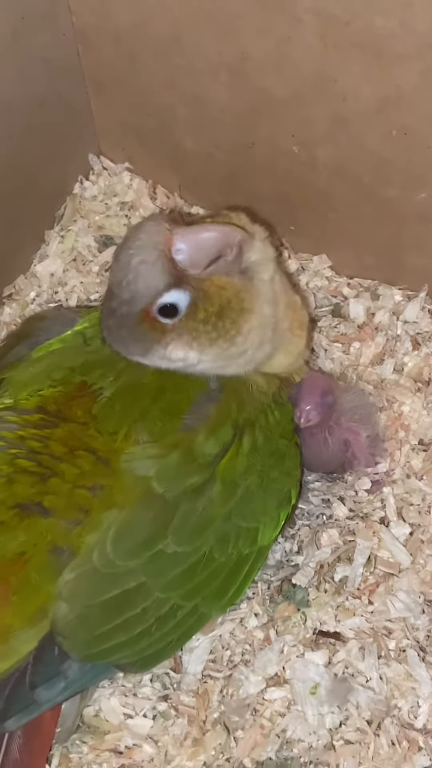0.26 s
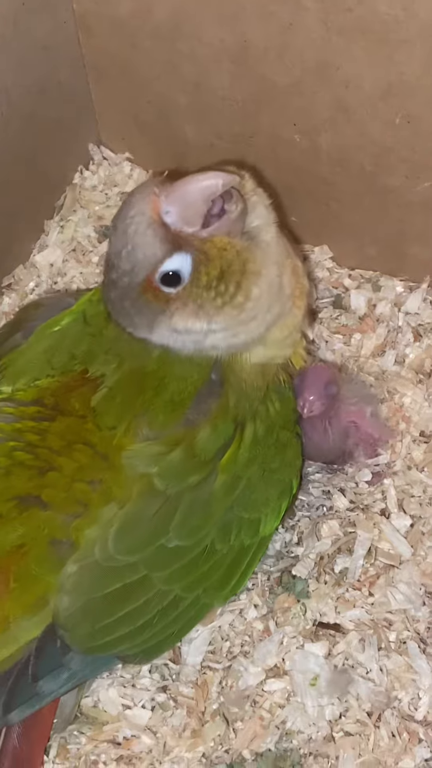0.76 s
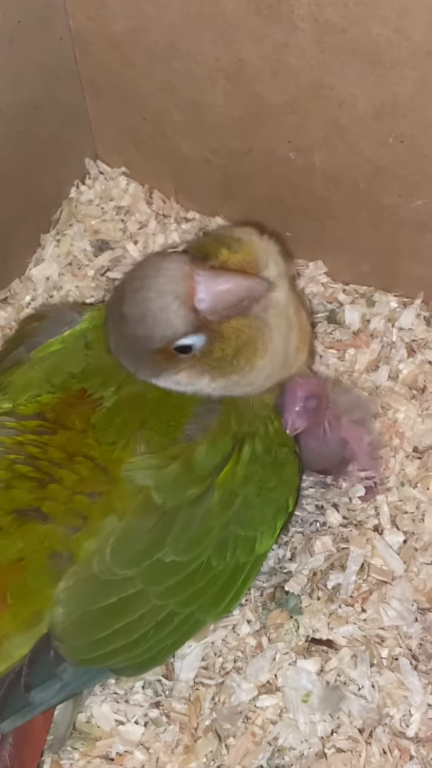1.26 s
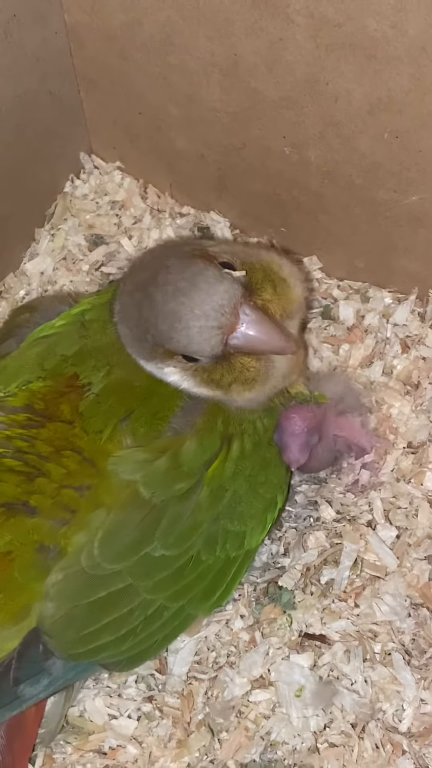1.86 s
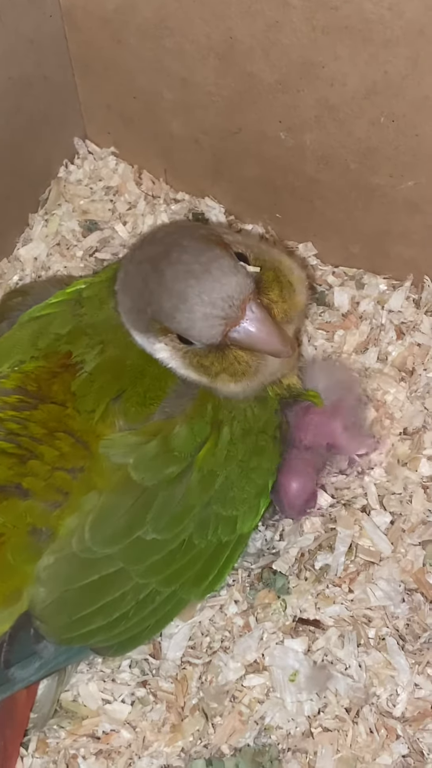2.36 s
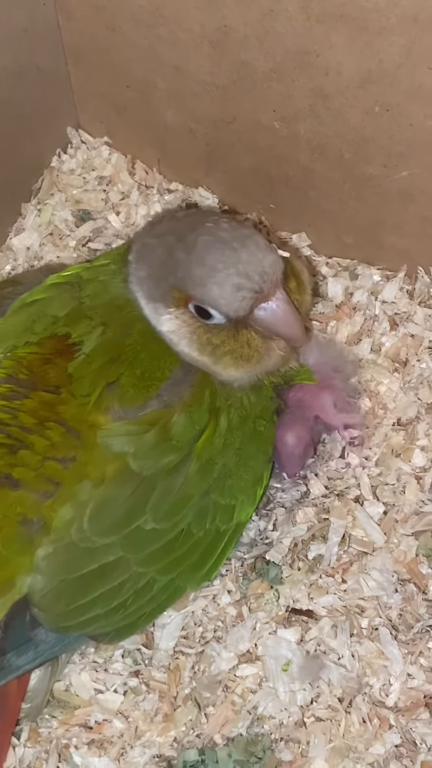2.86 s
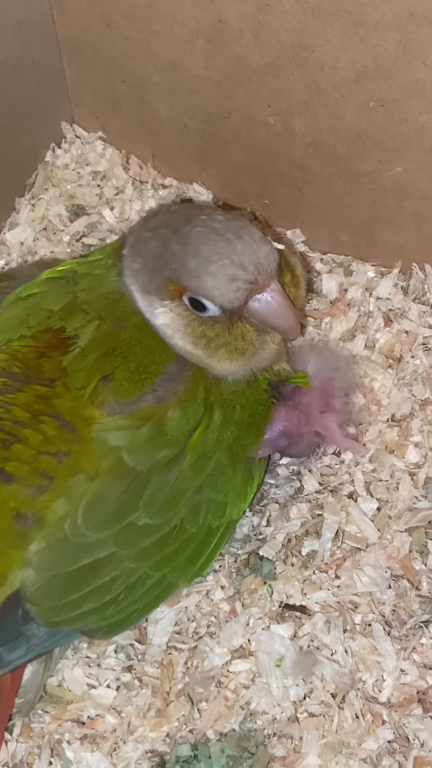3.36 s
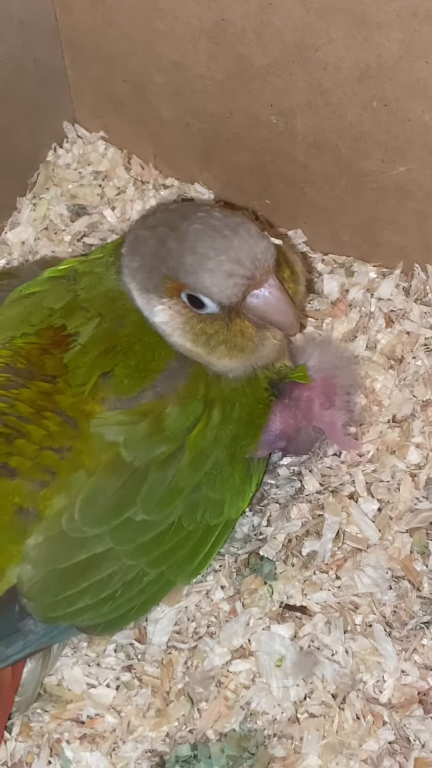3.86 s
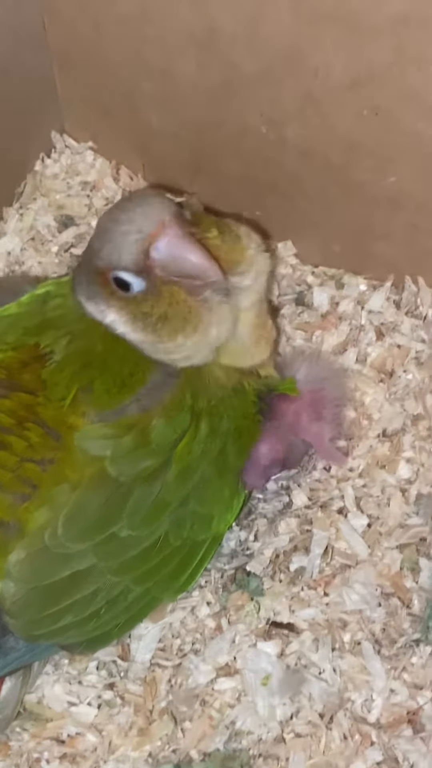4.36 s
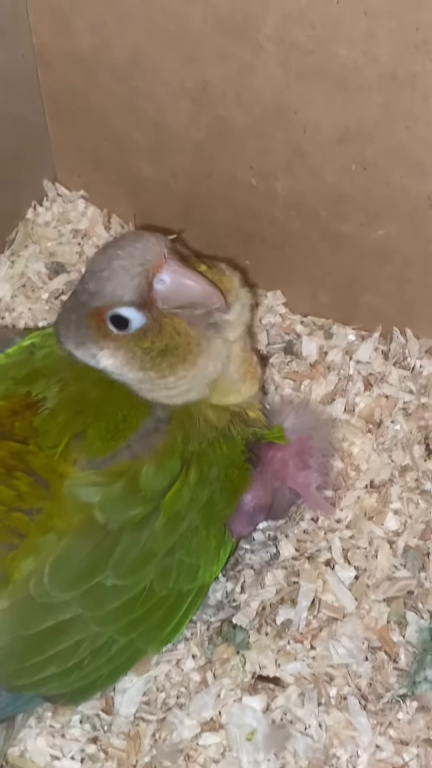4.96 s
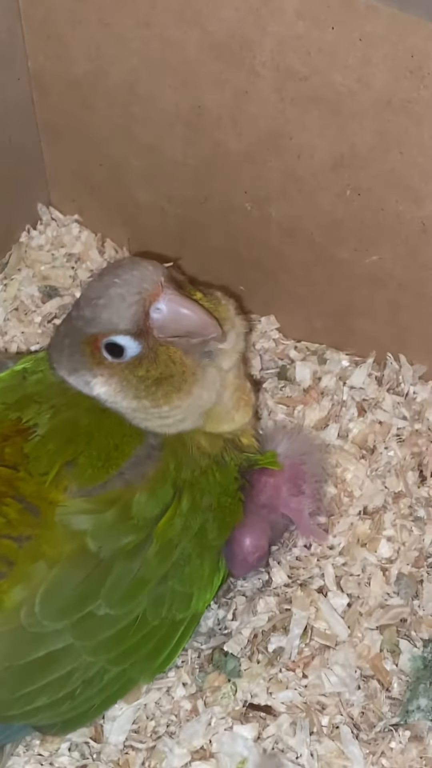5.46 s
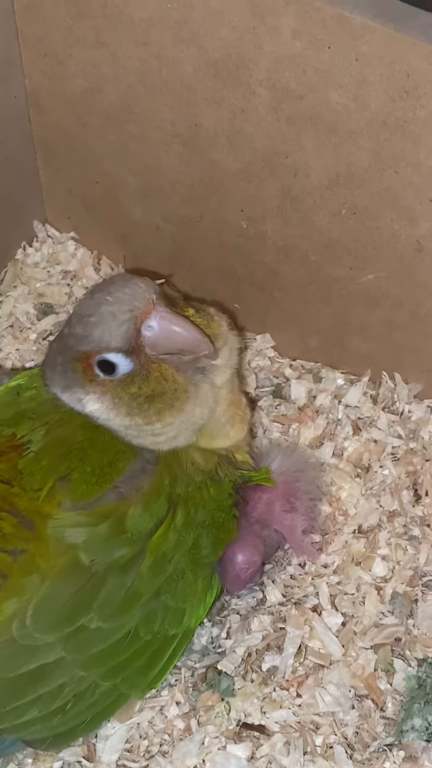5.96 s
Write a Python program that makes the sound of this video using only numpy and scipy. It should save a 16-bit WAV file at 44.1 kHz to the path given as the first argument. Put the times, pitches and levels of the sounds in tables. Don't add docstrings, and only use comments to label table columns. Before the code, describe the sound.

A tiny parrot chick gives hoarse, high peeps about once a second in a nest box, with rustling shavings and a sudden bump near four seconds.

```python
import sys
import numpy as np
from scipy import signal
from scipy.fft import rfft, irfft
from scipy.io import wavfile
from scipy.ndimage import uniform_filter1d, map_coordinates

SR = 44100
rng = np.random.default_rng(int(sys.argv[2]) if len(sys.argv) > 2 else 0)


def linear_from_db(decibels):
    return 10 ** (np.asarray(decibels, float) / 20)


def unload_wav(signal):
    wavfile.write(
        sys.argv[1],
        SR,
        np.round(np.clip(np.atleast_2d(signal).T, -1, 1) * 32767).astype(np.int16),
    )


N = 274302
TIME = np.arange(N) / SR
HZ = np.maximum(np.arange(N // 2 + 1) * SR / N, 1)

# [t/s, level/dB]
HUM = [(0.0, -63), (0.17, -66), (0.33, -51), (0.43, -64), (0.87, -54), (1.0, -65), (2.75, -62.5),
       (3.17, -74), (3.46, -57), (3.93, -58), (3.97, -48), (4.72, -58), (4.8, -46.5), (4.99, -53),
       (5.13, -66.5), (5.68, -59), (5.77, -69), (6.22, -67)]
# [f/Hz, level/dB]
HUM_COLOUR = [(20, -41), (45, -9), (60, -4), (70, 8), (82, -6), (150, -18), (220, -61.5), (500, -100)]
# [f/Hz, level/dB]
BOOM_COLOUR = [(100, -22.5), (160, 4), (300, -6), (430, -4.5), (520, -23), (800, -43)]
# [f/Hz, width/Hz, level/dB]
BOX_AIR = [(320.6, 6.8, 12), (376, 12, 9)]
# [f/Hz, level/dB]
DRAG_COLOUR = [(300, -21.5), (550, 4.5), (900, -2), (1400, -4), (2300, -8), (3500, -14), (7000, -37.5)]
# [f/Hz, level/dB]
SHAVINGS_COLOUR = [(2000, -28.5), (3500, -0.5), (5500, -1.5), (7500, -2), (10000, -5), (13000, -5),
                   (16200, -30)]
# [t/s, time to die by 20 dB/s, walls/dB, dragging/dB, shavings/dB]
MOVES = [(0.0, 0.65, -71, -77, -82), (0.53, .05, -71, -66, -79), (0.49, .1, -76, -75, -90),
         (0.63, .4, -82, -92, -86), (0.845, 0.7, -70, -84, -90), (1.42, 0.45, -73.5, -85.5, -79),
         (1.31, 0.8, -80, -81, -79.5), (1.68, 0.7, -85, -92, -85.5), (1.82, .06, -76, -68, -82),
         (2.0, 0.4, -85, -80, -79.5), (2.185, .08, -74, -80, -72.5), (2.28, .55, -84, -95, -75),
         (2.985, 0.1, -80, -85, -80), (2.8, 0.64, -87, -89.5, -87), (3.279, 0.13, -72, -93, -73.5),
         (3.45, .5, -59.5, -74.5, -84), (3.68, 0.32, -74.5, -84, -71), (3.77, 0.22, -83, -74, -68),
         (3.97, .09, -57, -59, -66), (4.037, .08, -45, -57, -66), (4.23, 0.9, -60.5, -75.5, -86.5),
         (4.85, 1.23, -72, -83.5, -99), (5.3, 1.1, -79.5, -86.5, -84.5), (5.7, 0.5, -80.5, -85.5, -85),
         (6.0, 3, -80.5, -87, -89)]
# [t/s, time to die by 20 dB/s, walls/dB, dragging/dB, shavings/dB]
JOLTS = [(0.298, 0.1, -60, -63, -99), (0.318, .035, -58, -60, -88), (0.565, .025, -76, -73, -88),
         (0.925, 1.5, -85, -88, -86.5), (1.597, 0.08, -64.5, -72.5, -86), (1.842, .09, -73, -62, -76),
         (2.21, .04, -66, -69, -82), (3.105, 0.6, -77.5, -80, -80), (3.39, 0.06, -70, -75, -72),
         (3.705, 0.19, -81, -79, -67), (3.94, 0.1761, -60, -58, -72), (4.018, .12, -48, -58, -57),
         (4.135, .11, -62, -68, -59), (4.757, 0.15, -71, -75, -95)]
RISE_SHARE, LONGEST_RISE_S, JOLT_RISE_S = 0.43, 0.046, 0.012
WALLS_REST_DB, DRAG_REST_DB, SHAVINGS_REST_DB = -77.5, -85.5, -90.5
WALLS_FOLLOW = 0.23

# [f/Hz, level/dB, t60/s]
CAGE_MODES = [(1150, -25, 1.0), (1410, -16, 0.31), (1700, -5, 0.45), (1860, -2, 0.35), (2060, 0, 0.6),
              (2280, -3, 0.8), (2590, -3, 0.3), (3390, -11, 0.35), (3750, -15, 0.3), (4390, -16, 0.2),
              (5210, -18, 0.2), (5630, -14, 0.2)]
# [t/s, level/dB, rattle/s]
CAGE_KNOCKS = [
    (3.388, -63.5, 0.12),
    (3.937, -58, 0.092),
    (4.016, -62, 0.04),
    (4.128, -53, 0.051),
    (4.2, -70, 0.22),
]
# [t/s, peak level/dB, f/Hz]
CHIP_SNAPS = [(0.298, -62, 900), (0.494, -66, 980), (0.529, -63, 1260), (0.535, -68, 3700),
              (0.562, -64, 1870), (0.923, -62, 1644), (1.593, -56, 751), (1.805, -61, 1300),
              (1.829, -66, 5000), (1.83, -66, 1800), (1.839, -50, 2380), (1.843, -60, 1000),
              (1.888, -66, 1200), (1.994, -64, 1400), (1.995, -70, 5800), (2.206, -60, 638),
              (3.102, -66, 1160), (3.903, -66, 2280), (4.008, -50, 1060), (4.014, -46, 500),
              (4.036, -27, 150)]
CRUNCH_S = 0.0022
# [t/s, time to die by 20 dB/s, level/dB]
FEATHER_BRUSHES = [
    (3.47, .15, -85),
    (3.708, .12, -64),
    (3.76, .08, -70),
    (3.965, .06, -67),
    (4.02, .07, -61),
    (4.06, .06, -66),
    (4.137, .05, -67),
]
# [f/Hz, level/dB]
FEATHER_COLOUR = [(6500, -30), (8500, -3), (10500, 0), (12500, -5), (15500, -8), (16500, -30)]

# [t/s, pitch f/Hz, level/dB]
SQUEAK = [
    (4.008, 2900, -70),
    (4.025, 3300, -64),
    (4.05, 3520, -61),
    (4.09, 3560, -68),
]
# [start t/s, length/s, level/dB, pitch factor of the falling note]
FAR_CALLS = [
    (1.149, .11, -60.5, 1),
    (2.425, 0.104, -60.5, 1.0),
    (3.719, .108, -60.5, .98),
    (5.112, .107, -62.5, 1.066),
]
# [share of length, pitch f/Hz, relative level/dB, relative octave level/dB]
FAR_SHAPE = [(0.0, 2927, -2.5, -22), (0.11, 3538, 1, -28.5), (0.26, 3780, -1, -25), (0.37, 3950, -5, -22),
             (0.485, 5205, -11, -8), (0.61, 5254, -12.5, -2.5), (0.75, 4850, -9.5, -5.5),
             (0.89, 3880, -6.5, -20), (1.0, 2930, -11.5, -24)]

# [t/s, pitch f/Hz, level/dB]
NEAR_PEEPS = [
    [(0.093, 5044, -46), (0.101, 5200, -30), (0.117, 5750, -42), (0.136, 5920, -28), (0.153, 5860, -29),
     (0.159, 5720, -37), (0.172, 5114, -25), (0.186, 4450, -27.5), (0.205, 2950, -60)],
    [(1.08, 5872, -30), (1.088, 5973, -29), (1.102, 5884, -31), (1.108, 5780, -42), (1.121, 5028, -24),
     (1.127, 4760, -28), (1.134, 4500, -26), (1.151, 3247, -51.5), (1.156, 3082, -62)],
    [(2.268, 4660, -54), (2.279, 5450, -33), (2.29, 5780, -30), (2.315, 5967, -30), (2.341, 5464, -29.5),
     (2.346, 5150, -39), (2.357, 4330, -32.5), (2.37, 3063, -59.5), (2.376, 2830, -68.5)],
    [(3.146, 4750, -40), (3.161, 5450, -31), (3.178, 5973, -33), (3.208, 6286, -26.5), (3.228, 5887, -36.5),
     (3.235, 5240, -23), (3.249, 4250, -27), (3.261, 2968, -50), (3.267, 2900, -78)],
    [(4.378, 5570, -38), (4.388, 5330, -31.5), (4.408, 5850, -35), (4.42, 6050, -29.5), (4.444, 5800, -34),
     (4.452, 5400, -26), (4.465, 4550, -29), (4.48, 3503, -43.5), (4.488, 3310, -77)],
    [(5.518, 5112, -48.5), (5.524, 5010, -40), (5.553, 6010, -24.5), (5.572, 6200, -32), (5.59, 5850, -27),
     (5.604, 4820, -38), (5.616, 4450, -33), (5.625, 3750, -40), (5.634, 3244, -66.5)],]
# [relative half tone level/dB, relative octave level/dB, breath level/dB, half tones end t/s]
PEEP_VOICES = [
    (-9, 0.5, -50, .168),
    (-8, -0.5, -54, 1.116),
    (-13, -4, -50, 2.341),
    (-10.5, 1.5, -55, 3.226),
    (-13.5, 1, -49, 4.452),
    (-15, 1.5, -50, 5.598),
]
# [first pop t/s, rasp start t/s, rasp end t/s, rasp peak level/dB, rasp end level/dB]
OPENINGS = [
    (0.0716, 0.083, 0.128, -30.5, -40.5),
    (1.022, 1.033, 1.077, -31, -31.5),
    (2.2505, 2.263, 2.274, -43, -38),
    (3.1328, 3.144, 3.175, -30, -35.5),
    (4.361, 4.369, 4.41, -32, -46),
    (5.504, 5.513, 5.545, -36, -42.5),
]
# [f/Hz, width/Hz, level/dB]
THROAT = [(1978, 600, -18.5), (4400, 730, -4.5), (5470, 590, 2.5), (6806, 650, -4), (8300, 1500, -14),
          (11100, 820, -16.5), (14800, 2500, -9)]
# [f/Hz, level/dB]
HALF_TONES = [(1500, -16), (3000, -12.5), (6000, -1), (9000, -3.5), (12000, -18.5), (15000, -19),
              (17000, -31.5)]
# [pitch f/Hz, relative level/dB]
OCTAVE = [(3000, -8), (3800, -12), (4550, -11), (5100, -21), (5700, -17), (5900, -28), (6300, -27)]
# [start t/s, end t/s]
THIRDS = (2.262, 2.316)
THIRDS_DULL_DB = 0.5
SLACK_DB, HALF_ENTRY_S, HALF_EXIT_S = -34, 0.005, 0.004
BREATH_START_DB, BREATH_SETTLE_S = 8, 0.045
BREATH_END_DB, BREATH_END_S = -12, 0.027
RASP_TOP_HZ, RASP_RISE_HZ, RASP_RISE_S = 1156, 517.3, 0.011
RASP_SWELL_S, RASP_SWELL_DB, RASP_FADE_S = 0.0063, 7, 0.0055
POP_GAP_S, POP_FIRST_DB = 0.0021, -12.5
POP_GROWTH_DB_PER_S, POP_SCATTER_DB = 550, 4

# [f/Hz, left lead/rad]
PORTS = [(0, 0), (3400, .1), (4300, .8), (5200, .4), (6030, 1.6), (6550, 2.4), (8050, 3.8), (8450, 4.3),
         (9300, 5.1), (9750, 6.1), (10900, 6.3), (12200, 8.2), (12700, 8.9), (14000, 10), (15300, 11.6),
         (16500, 13)]
# [f/Hz, relative level/dB]
DIFFUSE = [(60, -37), (180, -21), (400, -12), (800, -7), (1400, -8), (2500, -13), (16000, -13)]


def at_hz(points, hz):
    f, db = np.array(points)[:, :2].T
    return np.interp(np.log(hz), np.log(f), db)


def span(rows, fade):
    s, *columns = np.transpose(rows)
    where = slice(int((s[0] - fade) * SR), int((s[-1] + fade) * SR))
    t = TIME[where]
    gate = np.clip(np.minimum(t - t[0], t[-1] - t) / fade, 0, 1)
    return where, [np.interp(t, s, c) for c in columns], gate


def wobble(n, hz):
    steps = rng.standard_normal(int(n * hz / SR) + 3)
    return map_coordinates(steps, [np.arange(n) * hz / SR], order=3)


def resonance(x, hz, width_hz):
    r = np.exp(-np.pi * width_hz / SR)
    poles = [1, -2 * r * np.cos(2 * np.pi * hz / SR), r * r]
    return signal.lfilter([(1 - r * r) / 2, 0, (r * r - 1) / 2], poles, x + 1e-18)


def noise(curve_db, colour, patchy_db, grain_db, even_s):
    white = rng.standard_normal((2, N)) * linear_from_db(grain_db * wobble(N, 400))
    bands_db = 0.8 * wobble(len(HZ), 44) * (HZ > 1900)
    sides_db = [0 * HZ, at_hz(DIFFUSE, HZ)]
    shaped = irfft(rfft(white) * linear_from_db(at_hz(colour, HZ) + bands_db + sides_db), N)
    level_db = curve_db + patchy_db * wobble(N, 25)
    power = shaped[0] ** 2
    for _ in range(3):
        power = uniform_filter1d(power, int(even_s * SR / 2))
    return shaped / np.sqrt(power) * linear_from_db(level_db)


def echoes(x, t60):
    decay = linear_from_db(np.maximum(-60 * TIME / t60, -200))
    answer = rng.standard_normal(N) * decay * (TIME > 0.002)
    return irfft(rfft(x) * rfft(answer) / np.sqrt(np.sum(answer ** 2)), N)


def rumble(hum_db):
    return noise(hum_db, HUM_COLOUR, patchy_db=2.2, grain_db=-0.5, even_s=0.11)


def moved(rest_db, order):
    power = linear_from_db(2 * rest_db)
    for rows, longest_rise in ((MOVES, LONGEST_RISE_S), (JOLTS, JOLT_RISE_S)):
        for s, fall, *peaks_db in rows:
            rise = min(RISE_SHARE * fall, longest_rise)
            slope = np.where(TIME < s, (s - TIME) / rise, (TIME - s) / fall)
            power = power + linear_from_db(2 * (peaks_db[order] - 20 * np.minimum(slope, 10)))
    return 10 * np.log10(power)


def boom(hum_db):
    level_db = moved(WALLS_REST_DB + WALLS_FOLLOW * (hum_db - hum_db.mean()), order=0)
    walls = noise(level_db, BOOM_COLOUR, patchy_db=1.0, grain_db=2.0, even_s=0.16)
    hard = uniform_filter1d(level_db, size=20000)
    drive = walls * linear_from_db(hard - level_db + 2) * np.clip((hard + 75) / 8, 0.1, 1)
    return walls + sum(linear_from_db(db) * resonance(drive, hz, width) for hz, width, db in BOX_AIR)


def dragging():
    level_db = moved(DRAG_REST_DB, order=1)
    return noise(level_db, DRAG_COLOUR, patchy_db=2.5, grain_db=2.5, even_s=0.068)


def shavings():
    level_db = moved(SHAVINGS_REST_DB, order=2)
    return noise(level_db, SHAVINGS_COLOUR, patchy_db=2.5, grain_db=2.5, even_s=0.11)


def cage():
    force = np.zeros(N)
    for s, db, rattle in CAGE_KNOCKS:
        attack = np.clip((TIME - s) / 0.003, 0, 1)
        force += linear_from_db(db) * attack * np.exp(-np.abs(TIME - s) / rattle)
    clatter = resonance(force * rng.standard_normal((2, N)), 1500, 900)
    out = linear_from_db(12) * resonance(clatter, 2300, 1100)
    for hz, level_db, t60 in CAGE_MODES:
        width = np.log(1000) / np.pi / t60 + 20
        out += linear_from_db(level_db + 24.5) * resonance(force * rng.standard_normal((2, N)), hz, width)
    return out * linear_from_db([[0], [-8]])


def feathers():
    power = np.zeros(N)
    for s, fall, db in FEATHER_BRUSHES:
        slope = np.where(TIME < s, (s - TIME) / 0.03, (TIME - s) / fall)
        power += linear_from_db(2 * (db - 20 * np.minimum(slope, 5)))
    return noise(10 * np.log10(power), FEATHER_COLOUR, patchy_db=3.5, grain_db=3.0, even_s=0.1)


def chip_snaps():
    out, age = np.zeros(N), TIME[:2000]
    for (s, peak_db, hz), grit in zip(CHIP_SNAPS, rng.standard_normal((len(CHIP_SNAPS), 2000))):
        crunch = linear_from_db(peak_db + 14) * grit * np.exp(-age / CRUNCH_S)
        width = min(hz, 1300)
        out[round(s * SR):][:2000] += resonance(resonance(crunch, hz, width), hz, width)
    return out


def arch(rows, t):
    s, hz = np.transpose(rows)[:2]
    slope = np.gradient(hz) / np.gradient(s)
    k = np.clip(np.searchsorted(s, t) - 1, 0, len(s) - 2)
    step = s[k + 1] - s[k]
    u = np.clip((t - s[k]) / step, 0, 1)
    glide = hz[k] + (hz[k + 1] - hz[k]) * u * u * (3 - 2 * u)
    return glide + step * u * (1 - u) * (slope[k] * (1 - u) - slope[k + 1] * u)


def whistle(t, hz, level_db, octave_db, half_db, twelfth_db, jitter):
    hz = hz * (1 + jitter * wobble(len(t), 500))
    turn = 2 * np.pi * np.cumsum(hz) / SR
    octave = linear_from_db(octave_db + 3 * wobble(len(t), 150)) * np.sin(2 * turn + 1)
    twelfth = linear_from_db(octave_db + twelfth_db + 4 * wobble(len(t), 150)) * np.sin(3 * turn)
    tone = np.sin(turn) + octave + twelfth * np.clip((5000 - hz) / 300, 0, 1)
    thirds = (t > THIRDS[0]) & (t < THIRDS[1])
    for period, on in ((2, ~thirds), (3, thirds)):
        for k in range(1, 3 * period):
            if k % period == 0:
                continue
            broken_db = 1.7 * k / period * wobble(len(t), 170)
            dull_db = THIRDS_DULL_DB * max(k - 3, 0) * (period == 3)
            part_db = half_db + broken_db - dull_db + at_hz(HALF_TONES, hz * k / period)
            tone += on * linear_from_db(part_db) * np.sin(turn * k / period + k * k)
    return np.sqrt(2) * linear_from_db(level_db + 1.1 * wobble(len(t), 180)) * tone


def squeak():
    out = np.zeros(N)
    where, (_, level_db), gate = span(SQUEAK, fade=0.004)
    t = TIME[where]
    out[where] = gate * whistle(t, arch(SQUEAK, t), level_db, octave_db=-14, half_db=-40,
                                twelfth_db=-30, jitter=0.04)
    return out


def far_chick():
    tone, breath = np.zeros((2, N))
    for start, length, call_db, factor in FAR_CALLS:
        rows = np.array(FAR_SHAPE) * [length, 1, 1, 1] + [start, 0, call_db, 0]
        low, falling = rows[:4], rows[4:] * [1, factor, 1, 1]
        for note, half_db, hoarse_db, jitter in ((low, -24, 10, 0.013), (falling, -40, -8, 0.008)):
            where, (_, level_db, octave_db), gate = span(note, fade=0.0021)
            t = TIME[where]
            tone[where] += gate * whistle(t, arch(note, t), level_db, octave_db, half_db,
                                          twelfth_db=-26.5, jitter=jitter)
            swell = np.clip((t - t[0]) / 0.025, 0, 1)
            breath[where] += gate * swell * linear_from_db(level_db + hoarse_db) * rng.standard_normal(len(t))
        flip = slice(int(rows[3][0] * SR), int(rows[5][0] * SR))
        n = flip.stop - flip.start
        stop_db = 1500 * np.maximum(TIME[flip] - rows[4][0] + 0.004, 0)
        breath[flip] += linear_from_db(call_db + 7.5 + 4 * wobble(n, 330) - stop_db) * rng.standard_normal(n)
    thin = linear_from_db(-15) * resonance(resonance(breath, 11000, 2500), 11000, 2500)
    breath = linear_from_db(3) * resonance(resonance(breath, 2900, 2600), 3300, 2600)
    return tone + thin + resonance(breath, 2500, 770) + linear_from_db(-4.5) * resonance(breath, 4200, 900)


def throat(x):
    rung = np.zeros(N)
    for k, (hz, width, db) in enumerate(THROAT):
        rung += (-1) ** k * linear_from_db(db) * resonance(x, hz, width)
    return signal.sosfilt(signal.butter(2, 1100, "high", fs=SR, output="sos"), rung)


def rasp(age, irregular, waver):
    per_s = RASP_TOP_HZ - RASP_RISE_HZ * np.exp(-age / RASP_RISE_S)
    per_s = per_s * (1 + waver * wobble(len(age), 500))
    count = np.floor(2 * np.cumsum(per_s) / SR)
    between = np.where(count % 2, np.clip(age / 0.12, 0, 1), 1)
    sizes = np.clip(1 + irregular * rng.standard_normal(len(age)), 0, 1.4)
    return np.diff(count, prepend=0) * between * sizes


def near_chick():
    tone, puffs, pops, hiss = np.zeros((4, N))
    for rows, voice, opening in zip(NEAR_PEEPS, PEEP_VOICES, OPENINGS):
        half_db, octave_db, breath_db, half_end = voice
        where, (_, level_db), gate = span(rows, fade=0.0032)
        t = TIME[where]
        hz = arch(rows, t)
        entry_db = (t - opening[2]) / HALF_ENTRY_S * 10
        exit_db = (half_end - t) / HALF_EXIT_S * 10
        half_db = half_db + np.clip(np.minimum(exit_db, entry_db), SLACK_DB, 0)
        gust_db = BREATH_START_DB * np.exp((t[0] - t) / BREATH_SETTLE_S)
        spent_db = BREATH_END_DB * np.exp((t - t[-1]) / BREATH_END_S)
        breath_db = breath_db + gust_db + spent_db
        tone[where] += gate * whistle(t, hz, level_db, octave_db + at_hz(OCTAVE, hz), half_db,
                                      twelfth_db=-20, jitter=0.0037)
        puff_db = breath_db + 2.5 + 5 * wobble(len(t), 300)
        puffs[where] += gate * linear_from_db(puff_db) * rng.standard_normal(len(t))
        hiss_db = breath_db + octave_db - 0.5 + 4 * wobble(len(t), 250)
        hiss[where] += gate * linear_from_db(hiss_db) * rng.standard_normal(len(t))
    for first, start, end, peak_db, end_db in OPENINGS:
        swell = [(start, peak_db - RASP_SWELL_DB), (start + RASP_SWELL_S, peak_db),
                 (end, end_db), (end + RASP_FADE_S, end_db - 20)]
        where, (level_db,), gate = span(swell, fade=0.0012)
        age = TIME[where] - TIME[where][0]
        n = len(age)
        puffs[where] += gate * linear_from_db(level_db + 24 + 4 * wobble(n, 180)) * rasp(age, irregular=0.25, waver=0.05)
        puffs[where] += gate * linear_from_db(level_db - 9 + 7 * wobble(n, 310)) * rng.standard_normal(n)
        hiss[where] += gate * linear_from_db(level_db - 16) * rng.standard_normal(n)
        gaps, sizes = rng.uniform(-1, 1, (2, 10))
        since = np.append(0, np.cumsum(POP_GAP_S * (1 + 0.65 * gaps[1:])))
        growth_db = POP_FIRST_DB + POP_GROWTH_DB_PER_S * since + POP_SCATTER_DB * sizes
        pop_db = peak_db + np.minimum(growth_db, -9)
        before_rasp = first + since < start + POP_GAP_S
        pops[((first + since) * SR).astype(int)] = linear_from_db(pop_db + 20) * before_rasp
    closed_beak = linear_from_db(10) * resonance(resonance(pops, 3700, 900), 4500, 1000)
    return tone + throat(puffs + linear_from_db(-4) * pops) + closed_beak + resonance(hiss, 7800, 9600)


def scene():
    hum_db = np.interp(TIME, *np.transpose(HUM))
    common, unlike = rumble(hum_db) + boom(hum_db) + dragging() + shavings() + feathers() + cage()
    chicks = chip_snaps() + squeak() + far_chick() + near_chick()
    walled = chicks - 0.55 * resonance(chicks, 4800, 2400)
    common = common + chicks + linear_from_db(-24) * echoes(walled, t60=0.12) + linear_from_db(-28) * echoes(walled, t60=0.3)
    unlike = unlike + linear_from_db(-33) * echoes(chicks, t60=0.22)
    lead = np.interp(HZ, *np.transpose(PORTS)) / 2
    ports = irfft(rfft(common) * np.exp(1j * np.array([lead, -lead])), N)
    return ports + unlike * [[1], [-1]]


def top_cut(x):
    return signal.sosfilt(signal.butter(12, 17000, fs=SR, output="sos"), x)


def record(dry):
    low_pass = signal.cheby2(10, 70, 16900, fs=SR, output="sos")
    mix = signal.sosfilt(low_pass, dry)
    return top_cut(mix)


dry = scene()
out = record(dry)
unload_wav(out)
```